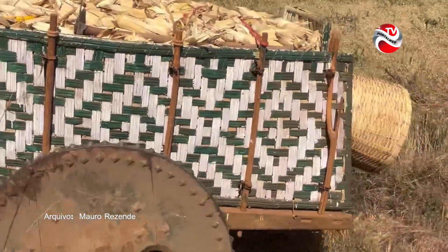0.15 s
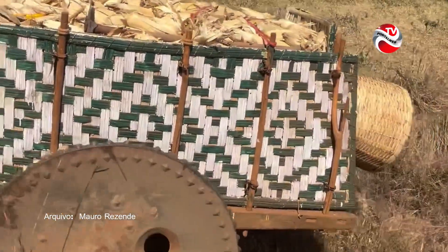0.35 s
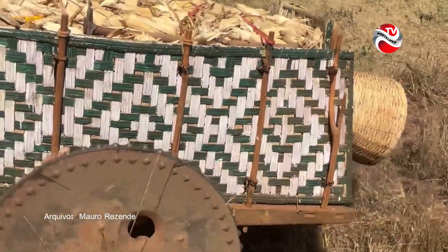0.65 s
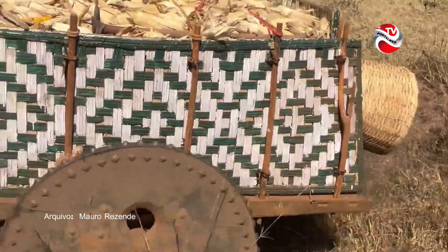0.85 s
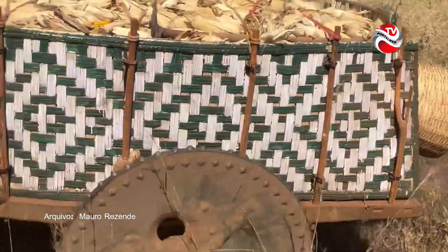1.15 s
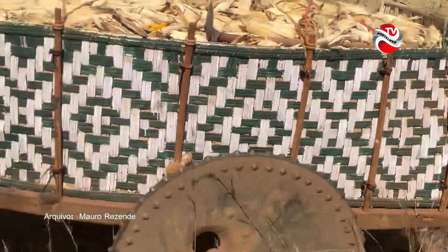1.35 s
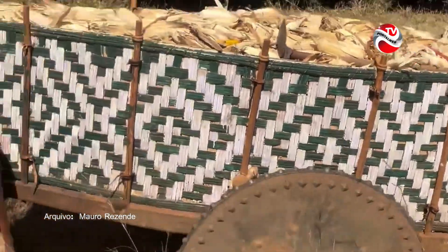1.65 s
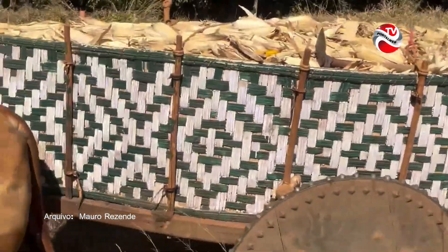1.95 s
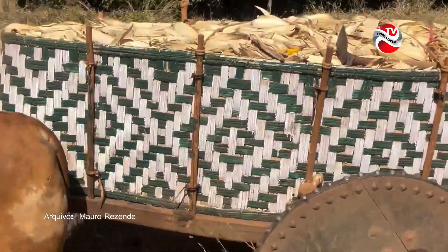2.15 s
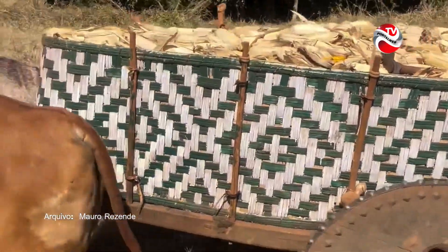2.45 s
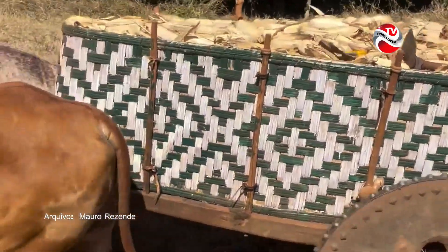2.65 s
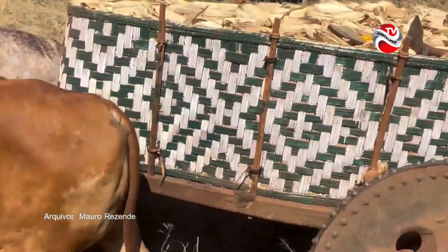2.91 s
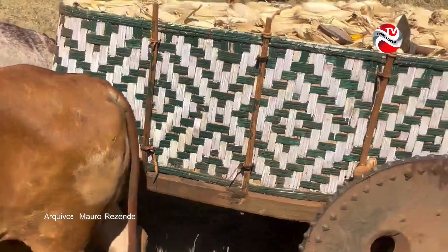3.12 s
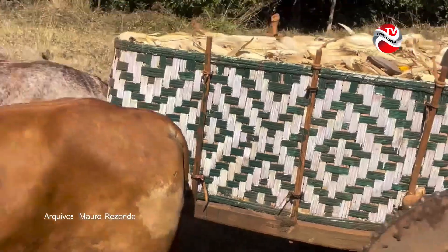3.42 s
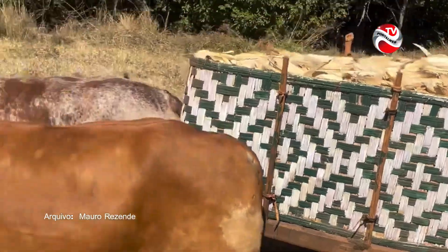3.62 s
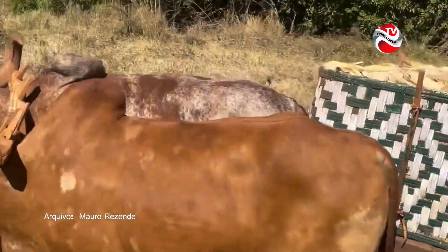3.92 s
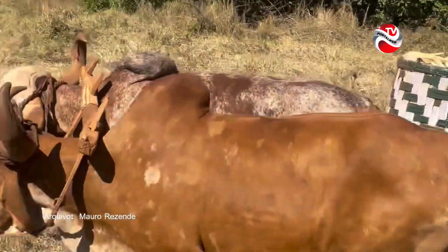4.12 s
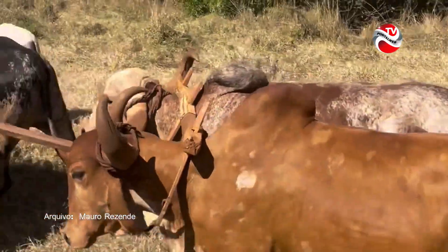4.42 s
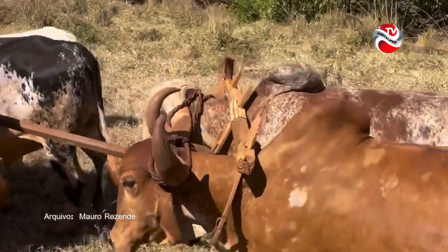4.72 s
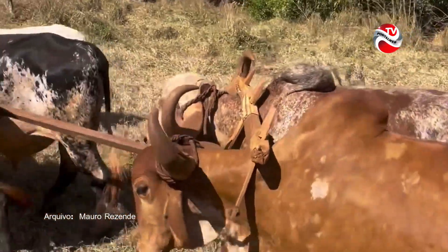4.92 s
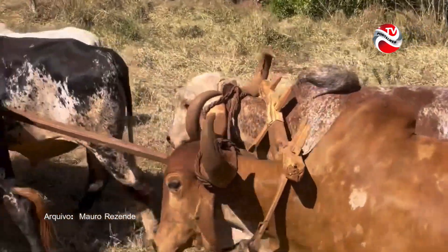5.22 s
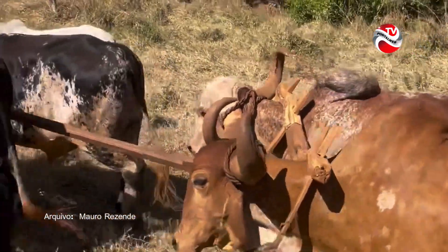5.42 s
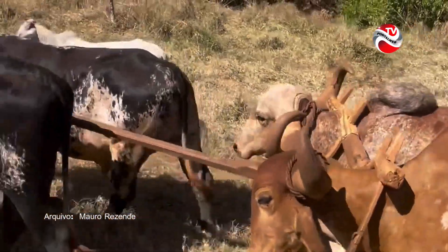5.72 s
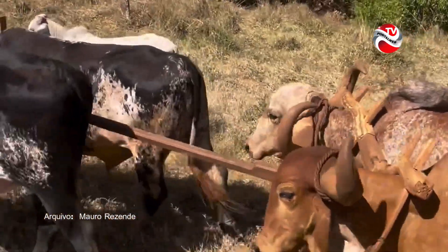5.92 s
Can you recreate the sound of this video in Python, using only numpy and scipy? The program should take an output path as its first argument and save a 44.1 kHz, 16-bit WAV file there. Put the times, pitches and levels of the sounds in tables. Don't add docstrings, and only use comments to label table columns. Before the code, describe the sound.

A wooden ox cart's axle drones in a loud, buzzing, wavering whine with gritty rasping, while wind buffets the microphone and a few wooden knocks land.

```python
import sys
import numpy as np
from scipy import signal
from scipy.fft import rfft, irfft, next_fast_len
from scipy.io import wavfile
from scipy.ndimage import uniform_filter1d, map_coordinates

SR = 44100
rng = np.random.default_rng(int(sys.argv[2]) if len(sys.argv) > 2 else 0)


def log_audio(samples):
    frames = np.atleast_2d(samples).T
    limited = np.clip(frames, -1, 1)
    pcm = np.round(limited * 32767).astype(np.int16)
    wavfile.write(sys.argv[1], SR, pcm)


def gain_from_db(level_db):
    decades = np.asarray(level_db, float) / 20
    return 10 ** decades


N = 267157

# [t/s, slip rate f/Hz, fundamental level/dB]
AXLE = [(0.0, 200.8, -16.5), (0.55, 203.1, -15), (0.71, 202.5, -23.5), (1.18, 200.2, -15.5),
        (1.75, 198.7, -18.5), (1.96, 198.5, -12.5), (2.39, 197.2, -14.5), (2.88, 198.7, -23),
        (3.47, 201.2, -16.5), (3.56, 202.8, -21), (3.86, 201.4, -12.5), (4.17, 202.1, -18.5),
        (4.44, 202.1, -16), (4.52, 201.7, -22.5), (4.77, 199.6, -15), (5.42, 197.1, -13),
        (5.91, 200.1, -23), (6.06, 198, -22)]
STRONG_DB = {2: -42, 3: -28.5, 4: -35.5, 5: -37, 6: -37.5, 7: -43.5, 8: -41, 9: -42.5, 10: -47.5, 11: -45,
             12: -40.5, 13: -39.5, 14: -47, 15: -38.5, 16: -47.5, 17: -43.5}
# [f/Hz, level/dB rms]
OVERTONES = [(3600, -47.5), (4000, -49), (5000, -52), (6500, -54), (8000, -52.5), (9000, -55.5),
             (10000, -49.5), (12000, -67)]
# [t/s, overtone order, half length/s, level/dB]
OVERTONE_FADES = [(0.11, 6, 0.064, 4.5), (0.201, 3, 0.063, -20), (0.363, 6, 0.079, -19), (0.387, 4, 0.088, -7),
                  (0.637, 4, 0.037, -25), (0.829, 6, 0.023, 4.5), (0.922, 6, 0.021, -12),
                  (1.057, 4, 0.072, 8.5), (1.232, 4, 0.37, 2.5), (1.254, 4, 0.025, -5), (1.426, 6, 0.32, 5),
                  (1.573, 4, 0.084, 6.5), (1.682, 3, 0.039, -11.5), (2.124, 4, 0.12, -18),
                  (2.234, 6, 0.076, -20.5), (2.295, 4, 0.06, 9.5), (2.474, 3, 0.073, 5),
                  (2.551, 4, 0.025, -24.5), (2.58, 6, 0.042, -3), (2.658, 4, 0.074, 7.5),
                  (2.75, 3, 0.27, -5.5), (2.77, 4, 0.034, -23), (3.004, 6, 0.16, 6.5), (3.012, 3, 0.069, 10.5),
                  (3.09, 4, 0.042, -8), (3.115, 3, 0.26, -7.5), (3.24, 4, 0.078, 4), (3.41, 3, 0.037, -18.5),
                  (3.756, 6, 0.16, 8), (3.838, 4, 0.093, -15), (4.075, 6, 0.088, -9), (4.077, 4, 0.15, 7),
                  (4.425, 4, 0.028, -22), (4.515, 6, 0.037, -4), (4.63, 3, 0.096, -4.5), (4.745, 6, 0.076, 5),
                  (4.93, 4, 0.081, -9), (5.407, 6, 0.028, -9.0), (5.51, 4, 0.046, -12.5),
                  (5.604, 3, 0.034, -13), (5.607, 6, 0.056, -19), (5.94, 4, 0.083, -11),
                  (0.153, 5, 0.04, -35.5), (0.232, 7, 0.052, 3), (0.337, 2, 0.045, -23),
               (0.55, 5, 0.019, -9.5), (0.823, 5, 0.022, 6), (0.845, 2, 0.016, 11), (0.855, 7, 0.018, 9),
               (0.955, 2, 0.053, -16), (1.048, 7, 0.083, -8), (1.14, 5, 0.071, 5.5), (1.404, 5, 0.026, -9),
               (1.405, 7, 0.079, 10), (1.473, 2, 0.116, 7), (1.667, 7, 0.14, -17), (1.907, 5, 0.041, 4.5),
               (1.92, 2, 0.084, 13), (1.997, 7, 0.12, 8.5), (2.228, 5, 0.062, -10.0),
               (2.367, 2, 0.027, -28.5), (2.444, 2, 0.086, 10), (2.565, 7, 0.042, -5), (2.697, 5, 0.074, 3),
               (2.853, 7, 0.075, 2), (3.013, 7, 0.016, -11.5), (3.023, 5, 0.068, -11.0),
               (3.206, 2, 0.14, -16), (3.21, 7, 0.156, -13), (3.347, 5, 0.065, 6.5), (3.413, 5, 0.03, -9.5),
               (3.537, 5, 0.12, 6.5), (3.845, 2, 0.09, 4.5), (3.85, 5, 0.0153, -17.5),
               (4.35, 5, 0.057, 9.5), (4.391, 7, 0.11, -8), (4.45, 2, 0.276, 5.5), (4.612, 5, 0.077, 4),
               (4.877, 2, 0.071, -1), (4.98, 2, 0.031, 12), (5.21, 7, 0.56, 4), (5.45, 2, 0.33, -5.5),
               (5.61, 7, 0.02, -25), (5.72, 5, 0.025, -7), (5.883, 7, 0.059, 5), (5.903, 2, 0.077, 8.5),
               (5.963, 5, 0.064, 17.5), (6.05, 5, 0.28, -19), (6.07, 7, 0.031, -12),
                  (0.032, 9, 0.062, -22), (0.035, 10, 0.05, -10.5), (0.09, 8, 0.28, -8),
              (0.197, 10, 0.12, 10.5), (0.2, 11, 0.071, 6.5), (0.76, 8, 0.016, -19.5), (0.824, 8, 0.044, 7),
              (0.857, 9, 0.035, 5), (1.01, 10, 0.107, -6), (1.01, 11, 0.16, -16), (1.249, 8, 0.067, -17.5),
              (1.254, 11, 0.095, 10), (1.45, 10, 0.051, 13.5), (1.624, 9, 0.18, 11), (1.698, 11, 0.062, 9),
              (1.745, 8, 0.4, 6.5), (1.763, 10, 0.031, -27), (2.04, 9, 0.034, -12),
              (2.043, 11, 0.052, -11.5), (2.116, 8, 0.055, 7), (2.177, 9, 0.035, 4),
              (2.208, 10, 0.018, -21), (2.22, 11, 0.1, 6), (2.35, 10, 0.39, 10), (2.392, 9, 0.29, 4),
              (2.52, 8, 0.3, -4.5), (2.506, 10, 0.038, -16), (2.563, 11, 0.02, -21), (2.772, 9, 0.024, -17),
              (3.044, 10, 0.028, 14), (3.107, 11, 0.5, 12), (3.253, 9, 0.63, -3.5), (3.254, 8, 0.048, 5.5),
              (3.381, 11, 0.052, -23), (3.436, 8, 0.053, -14), (3.51, 10, 0.022, -18),
              (3.63, 10, 0.058, 12.5), (3.69, 8, 0.1, -18), (4.222, 8, 0.2, 3), (4.772, 8, 0.32, -8.5),
              (4.916, 11, 0.4, -1), (5.03, 8, 0.19, 14), (5.506, 9, 0.039, 13), (5.635, 8, 0.035, 2),
              (5.944, 11, 0.056, 10.5), (6.06, 11, 0.018, -20), (6.09, 8, 0.044, -14.0),
              (6.09, 9, 0.48, -14),
                  (-0.05, 15, 0.485, -12), (-0.02, 13, 0.024, -20), (0.01, 17, 0.06, -17), (0.046, 16, 0.047, -15),
          (0.5, 13, 0.027, 4), (1.032, 12, 0.43, 9.5), (1.026, 17, 0.13, -12), (1.082, 16, 0.053, 4),
          (1.233, 12, 0.072, -18), (1.47, 12, 0.07, 5), (1.547, 15, 0.13, 9), (1.575, 13, 0.037, -17.0),
          (1.58, 16, 0.118, -13), (1.58, 17, 0.18, 0), (1.597, 14, 0.04, 8.5), (1.87, 12, 0.038, 9),
          (2.087, 14, 0.04, 16), (2.36, 14, 0.034, 20), (2.348, 16, 0.043, 10), (2.52, 13, 0.024, -31),
          (2.534, 15, 0.027, -22), (2.567, 12, 0.037, -9.5), (2.676, 13, 0.025, 9.5), (2.904, 17, 0.035, 7),
          (2.905, 15, 0.11, -8), (3, 12, 0.182, 3), (3.04, 17, 0.048, -15), (3.053, 14, 0.23, 15),
          (3.064, 16, 0.042, 14.0), (3.367, 13, 0.053, -27), (3.376, 12, 0.05, -32), (3.459, 13, 1, 7.5),
          (3.57, 16, 0.03, 18), (3.744, 12, 0.061, -21), (3.794, 15, 0.078, 5), (4.157, 15, 0.033, -25),
          (4.488, 13, 0.41, -13), (4.495, 12, 0.065, -10.5), (4.71, 12, 0.15, 7.5), (4.75, 17, 0.052, 4.5),
          (4.976, 14, 0.074, 13), (5.06, 17, 0.036, 11), (5.1, 12, 0.1, -11.5), (5.173, 15, 0.12, 7),
          (5.61, 17, 0.12, -10), (5.638, 13, 0.22, -26.5), (5.748, 15, 0.24, -6.5), (5.895, 14, 0.04, 8)]
# [t/s, overtone order or 0 for 2 to 17 together, half length/s, level/dB]
SHORT_CHANGES = [(0.834, 0, 0.03, 3.5), (1.44, 0, 0.024, -3), (3.95, 8, 0.033, -1), (4.07, 8, 0.027, 5),
                 (4.17, 8, 0.02, -3), (4.31, 8, .05, 8), (4.873, 8, 0.028, -18), (5.06, 8, 0.022, -6),
                 (5.3, 8, 0.048, -6.5), (5.47, 8, .025, -5), (5.65, 8, 0.021, 5.5), (5.42, 9, .025, -12),
                 (5.66, 9, 0.055, -6), (5.8, 15, 0.073, 6), (3.34, 15, 0.069, -11), (4.696, 15, 0.027, 6),
                 (5.733, 3, 0.097, 4.5)]
# [t/s, half length/s, favoured f/Hz, level/dB]
BITES = [
    (4.001, 0.099, 3770, 4.5),
    (4.388, 0.062, 3760, 9),
    (1.505, 0.91, 5900, 5),
    (3.088, 0.21, 6150, 7),
    (4.495, 0.077, 6540, 8),
    (5.606, 0.18, 4797, -17),
]
SHUDDER = [
    5.715,
    5.818,
    5.866,
    5.916,
    5.97,
]
# [t/s, half length/s, level/dB]
GRIND = [
    (0.416, 0.18, -3),
    (1.124, 0.061, 2.5),
    (1.7, 0.66, 1),
    (2.43, 0.058, 2.5),
    (2.645, 0.026, 4),
    (2.916, 0.045, 2.5),
    (4.056, 0.048, 3),
    (3.2, 0.076, -2),
]
# [t/s, half length/s, level/dB]
EASES = [
    (3.0, .3, -11),
    (4.3, .15, -7),
    (5.45, .22, -7),
]
# [f/Hz, level/dB per Hz]
GRIT = [(250, -16), (700, -9.5), (2500, -7), (4500, -9), (6500, -7.5), (9500, 1), (9800, -1.5),
        (12000, -17.5), (12400, -16), (13700, -24.5), (14500, -25.5), (15500, -22)]
# [t/s, half length/s, buffet level/dB, edge of the gust level/dB]
WIND = [(0, 0.022, -31.5, -29), (0.24, .04, -54.5, 9), (0.45, 0.086, -58.5, 12.5),
        (0.815, 0.13, -55.5, 3.5), (1.09, 0.076, -51.5, -17), (1.71, 0.1, -51.5, -28),
        (2.205, 0.078, -44.5, -16.5), (2.4, 0.084, -30.5, -13), (2.546, 0.032, -26, -7),
        (2.69, 0.072, -32.5, -52), (3.004, 0.094, -34.5, -50), (3.147, 0.012, -41, -22),
        (3.24, 0.03, -28.5, -32), (3.361, 0.077, -42, -14), (4.097, 0.16, -44.5, -9),
        (4.315, 0.046, -31, -6), (4.607, 0.09, -31.5, -18), (4.76, 0.039, -38, -34),
        (4.855, 0.023, -30, 1.5), (4.933, 0.023, -31, -10.5), (4.972, 0.026, -24, -0.5),
        (5.04, 0.04, -20.5, -11), (5.082, 0.026, -23, -16.5), (5.207, 0.028, -30, -12),
        (5.39, 0.019, -36, -34), (5.554, .1, -42.5, -5), (5.816, 0.029, -37, -3.5),
        (5.887, 0.052, -34.5, -32), (6.011, 0.037, -34.5, -30)]
# [f/Hz, level/dB per Hz]
BUFFET = [(20, -44), (40, 0), (60, 13), (130, 5), (200, 12), (300, -56.5)]
# [f/Hz, level/dB per Hz]
EDGE = [(100, -11.5), (200, 1.5), (300, -6), (450, -14.5), (700, -22), (1000, -87)]
# [t/s, peak level/dB, dullness level/dB]
KNOCKS = [
    (0.009, -27, -5),
    (2.541, -35, -4),
    (2.571, -32, -9),
    (4.477, -9, -12),
    (4.85, -28, -6),
    (5.056, -12, -1),
    (5.195, -15.5, -1),
    (5.8, -20, 6),
]
# [f/Hz, width f/Hz, level/dB]
YOKE = [(147, 55, -12), (358, 110, -4), (500, 220, -15.5)]
# [t/s, peak level/dB]
RUSTLE = [
    (.22, -42),
    (.3, -44),
    (.5, -46),
    (.82, -44),
    (2.38, -38),
    (2.95, -41),
    (3.3, -47.5),
    (3.6, -40),
    (4.05, -43),
    (5.45, -45),
]
# [f/Hz, level/dB per Hz]
HUSKS = [(600, -30), (1100, -10), (1700, -2), (2200, 0), (3000, -8), (4200, -24), (6000, -50)]
# [t/s, peak level/dB, f/Hz]
THUMPS = [(2.419, -24, 117), (2.534, -20, 131), (2.564, -22, 60), (4.628, -16, 145), (4.68, -31, 137),
          (4.87, -19, 100), (4.925, -26, 150), (4.956, -23.5, 71), (4.981, -13, 259.1), (5.02, -10.5, 65.3),
          (5.039, -14, 60.7), (5.057, -14, 75), (5.111, -14, 65), (5.22, -20, 60), (5.62, -32, 140),
          (5.799, -15, 138)]
# [f/Hz, phase/rad]
LEFT_LAG = [(200, -.05), (600, -1.2), (1000, .1), (1800, -.1), (2500, -2.1), (4400, -3), (5000, -3.6),
            (5600, -6.1), (7000, -7.3), (8600, -9.3), (9600, -9.42), (10300, -9), (12000, -12.5),
            (14600, -15.7)]
# [f/Hz, level/dB]
LEFT_GAIN = [(400, 1.5), (750, 7.5), (1200, 6.5), (2400, -3.5), (3500, -2.5), (4100, 4.5), (5000, -2.5),
             (5600, -0.5)]
# [f/Hz, likeness 0..1]
ALIKE = [(200, 0.97), (600, 1), (1500, 0.94), (2500, 0.33), (3900, 0.31), (4700, 0.18), (6000, 0.81),
         (7000, 1), (8600, 0.9), (9550, 0.89), (9800, 0.59), (11300, 0.18), (12200, 0.68), (14000, 0.2)]
# [f/Hz, level/dB]
MID_KEPT = [(3600, 0), (4300, -3), (4900, -6), (5200, 0), (8200, 0), (9000, -1), (9080, -60), (9500, -60),
            (9580, 0), (14250, 0), (14400, -60)]


def unit(x):
    return x / np.sqrt(np.mean(np.abs(x) ** 2) + 1e-20)


def along(points, hz):
    f, v = np.transpose(points)
    return np.interp(np.log(hz + 1), np.log(f + 1), v)


def curves(rows):
    s, *cols = np.transpose(rows)
    return [np.interp(np.arange(N) / SR, s, c) for c in cols]


def bump(s, half, t=np.arange(N) / SR):
    return np.exp(-((t - s) / half) ** 2 / 2)


def drift(rate, t):
    return map_coordinates(rng.standard_normal(400), [t * rate], mode="wrap")


def wobble(rate):
    coarse = np.arange(0, N + 64, 64)
    return np.interp(np.arange(N), coarse, drift(rate, coarse / SR))


def filtered(x, response):
    n = x.shape[-1]
    m = next_fast_len(n + SR // 2)
    return irfft(rfft(x, m) * response(np.fft.rfftfreq(m, 1 / SR)), m)[..., :n]


def rush(spectrum, patchy_db):
    z = signal.stft(rng.standard_normal((2, N)), nperseg=512)[2]
    field = uniform_filter1d(rng.standard_normal(z.shape[1:]), size=8, axis=0)
    field = uniform_filter1d(field, size=12, axis=1)
    pair = signal.istft(z * gain_from_db(patchy_db * unit(field)), nperseg=512)[1][:, :N]
    return unit(filtered(pair, lambda hz: gain_from_db(along(spectrum, hz))))


def slip_cycle():
    hz = uniform_filter1d(curves(AXLE)[0], size=SR // 8) * (1 + 0.00126 * wobble(40))
    return 2 * np.pi * np.cumsum(hz) / SR


def axle(cycle):
    every = 64
    now = np.arange(N) / SR
    t = now[::every]
    hz, first_db = (c[::every] for c in curves(AXLE))
    shudder = gain_from_db(-15 * sum(bump(s, 0.009, t) for s in SHUDDER))
    grip_db = 1.2 * drift(15, t)
    grip_db = grip_db + sum(db * bump(s, half, t) for s, order, half, db in SHORT_CHANGES if round(order) == 0)
    bite_hz = np.array([row[2] for row in BITES])
    bites_db = np.array([db * bump(s, half, t) for s, half, _, db in BITES])
    changes = OVERTONE_FADES + SHORT_CHANGES

    pair = np.zeros((2, N))
    slip, turn = np.exp(1j * cycle), 1
    for k in range(1, 60):
        turn = turn * slip
        paths = np.array([drift(7 + .25 * k, t) + 1j * drift(7 + .25 * k, t) for _ in "ab"]) / np.sqrt(2)
        flicker_db = (.9 + .15 * k) * np.clip(drift(14, t) + .6 * drift(32, t), -3, 1)
        if k == 1 or k in STRONG_DB:
            if k == 1:
                steady_db = first_db + flicker_db / 2
            else:
                swells_db = sum(db * bump(s, half, t) for s, order, half, db in changes if round(order) == k)
                steady_db = STRONG_DB[k] + swells_db + flicker_db + grip_db
            direct = np.exp(.03j * k * drift(6, t))
            scattered = paths[1] * (.35 if k > 6 else 1)
            gain = gain_from_db(steady_db) * np.array([direct, scattered])
            if k == 3:
                gain = gain * shudder
        else:
            overtone_hz = k * hz.mean()
            bite = gain_from_db(np.exp(-(np.log(overtone_hz / bite_hz) / 0.12) ** 2 / 2) @ bites_db)
            gain = gain_from_db(along(OVERTONES, overtone_hz)) * bite * (paths * 0.8 + [[.6], [0]])
        gain = np.sqrt(2) * gain * np.exp(2j * np.pi * rng.random())
        pair += np.array([(np.interp(now, t, path) * turn).real for path in gain])
    return pair


def grind(cycle):
    level_db = -33.5 + sum(db * bump(s, half) for s, half, db in GRIND)
    level_db = level_db + 0.45 * wobble(14) + 1.56 * wobble(45)
    ease_db = sum(db * bump(s, half) for s, half, db in EASES)
    slip = 1 + 0.067 * np.cos(cycle) + 0.051 * np.cos(2 * cycle)
    rasp = unit(slip * rush(GRIT, patchy_db=2.5))
    dull = uniform_filter1d(rasp, size=14, axis=1)
    return gain_from_db(level_db) * (rasp + (gain_from_db(ease_db) - 1) * dull)


def wind():
    gusts = np.array([gain_from_db(db) * bump(s, half) for s, half, db, _ in WIND])
    buffet = gain_from_db(-58) + gusts.sum(axis=0)
    edge = gain_from_db(-54) + gain_from_db(np.array([edge_db for *_, edge_db in WIND])) @ gusts
    lumps = wobble(21.79)
    hard = np.clip((20 * np.log10(buffet) + 45) / 18, 0, 1)
    low = buffet * unit(gain_from_db(3.2 * lumps) * rush(BUFFET, patchy_db=1))
    pops_db = hard * np.clip(1.5 * lumps + 3.5 * wobble(45) - 2, -12, 3)
    high = edge * gain_from_db(6.0 + pops_db) * rush(EDGE, patchy_db=1.5)
    port_top = .4
    shared, own = port_top * np.tanh((low + high) / port_top)
    return np.array([shared + 0.67 * own, shared - 1.0 * own])


def knocks():
    blows = np.zeros(N)
    u = np.arange(SR // 50) / SR / 0.0004
    for s, db, dull_db in KNOCKS:
        push = u * (np.exp(-u) + gain_from_db(dull_db - 10) * np.exp(-u / 3))
        blows[round(s * SR):][:len(u)] += gain_from_db(db + 18.0) * push

    def wood(f):
        modes = enumerate(YOKE)
        return sum((-1) ** k * gain_from_db(db) * 1j * f * w / (c * c - f * f + 1j * f * w) for k, (c, w, db) in modes)

    return filtered(blows, wood)


def rustle(cycle):
    level = gain_from_db(-82) + sum(gain_from_db(db) * bump(s, 0.042) for s, db in RUSTLE)
    crackle = unit(gain_from_db(1.2 * wobble(60) + 1.5 * wobble(14)) * rush(HUSKS, patchy_db=2.5))
    halfway = np.zeros((2, N))
    for k in range(3, 20):
        halfway += wobble(16) * np.cos((k + .5) * cycle + 2 * np.pi * rng.random((2, 1)))
    halfway = unit(filtered(halfway, lambda hz: gain_from_db(along(HUSKS, hz))))
    return level * (crackle + gain_from_db(-7.0) * halfway)


def thumps():
    t = np.arange(N) / SR
    return sum(gain_from_db(db) * bump(s, 0.36 / hz) * np.sin(2 * np.pi * hz * (t - s)) for s, db, hz in THUMPS)


def ports(pair):
    def spread(hz):
        turn = np.arccos(np.clip(along(ALIKE, hz), 0, 1)) / 2
        return np.array([np.cos(turn), np.sin(turn)])

    def left_and_right(hz):
        half = gain_from_db(along(LEFT_GAIN, hz) / 2) * np.exp(-.5j * along(LEFT_LAG, hz))
        return np.array([half, 1 / half])

    direct, scattered = filtered(pair, spread)
    return filtered(np.array([direct + scattered, direct - scattered]), left_and_right)


def scene():
    cycle = slip_cycle()
    cart = axle(cycle) + grind(cycle) + rustle(cycle)
    return ports(cart) + wind() + knocks() + thumps()


def low_pass(x):
    return signal.sosfilt(signal.butter(12, 15750, fs=SR, output="sos"), x)


def record(dry):
    mid = filtered(dry.mean(axis=0), lambda hz: gain_from_db(along(MID_KEPT, hz)))
    passed = np.arange(N) / SR > 4.2
    mid = mid - .22 * passed * filtered(mid, lambda hz: np.abs(hz - 4700) < 400)
    side = filtered((dry[0] - dry[1]) / 2, lambda hz: np.where((hz < 11700) | (hz > 14000), 1, .4))
    return low_pass(np.array([mid + side, mid - side]))


dry = scene()
out = record(dry)
log_audio(out)
```